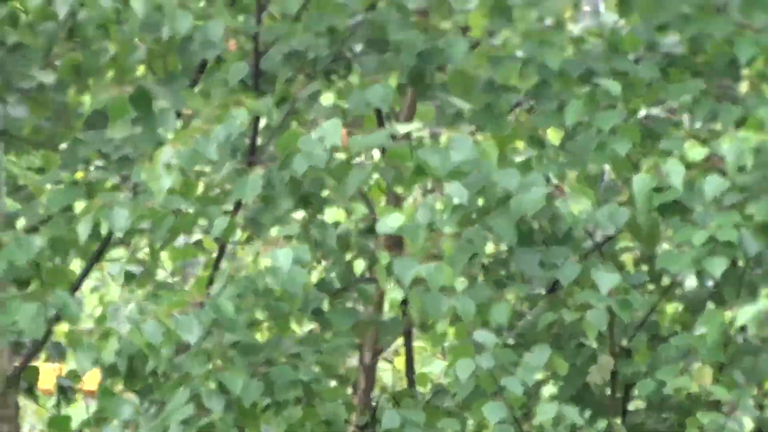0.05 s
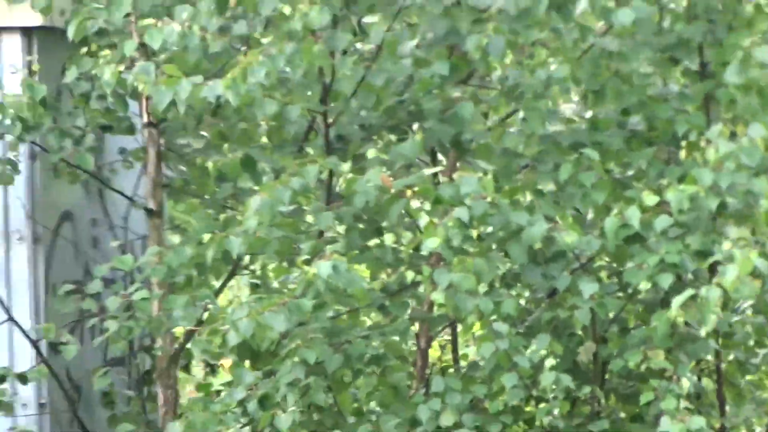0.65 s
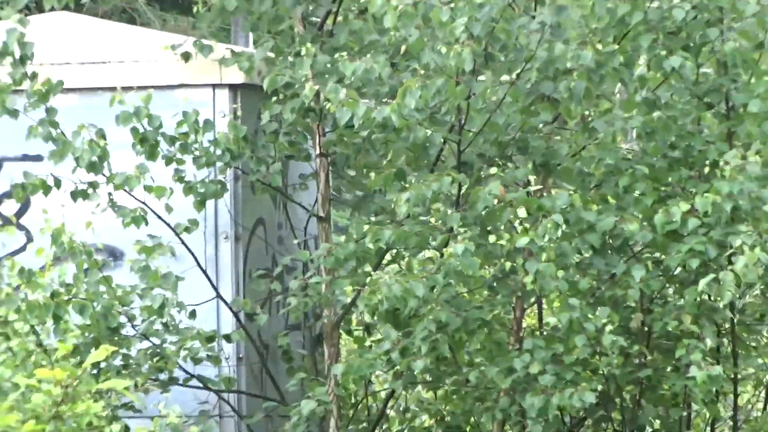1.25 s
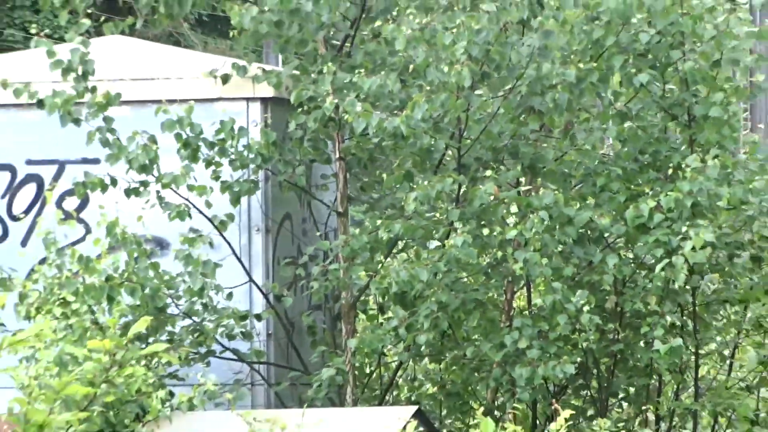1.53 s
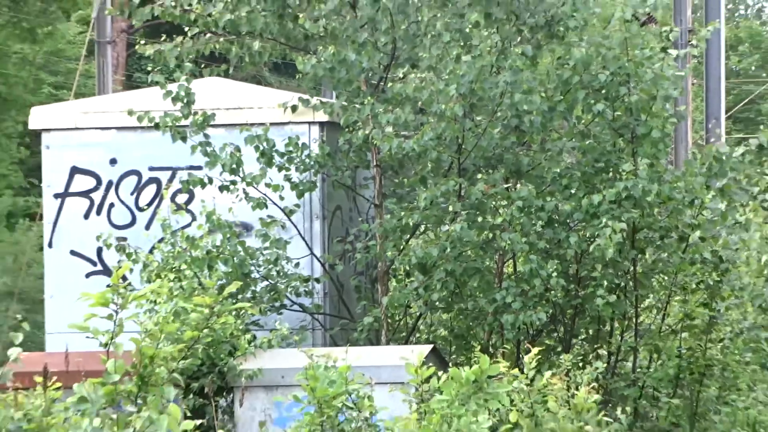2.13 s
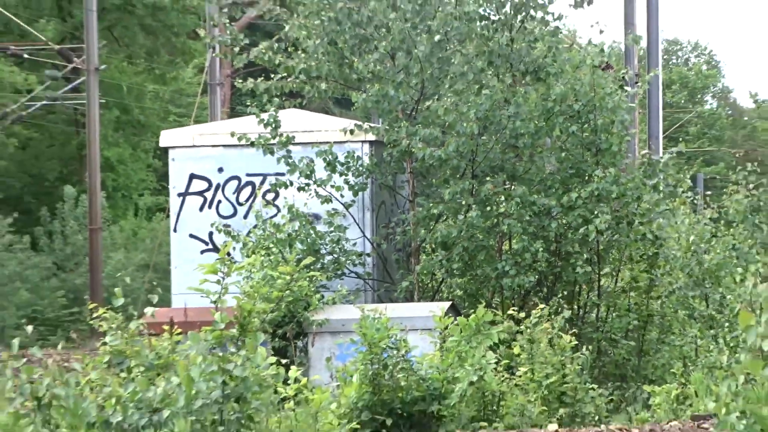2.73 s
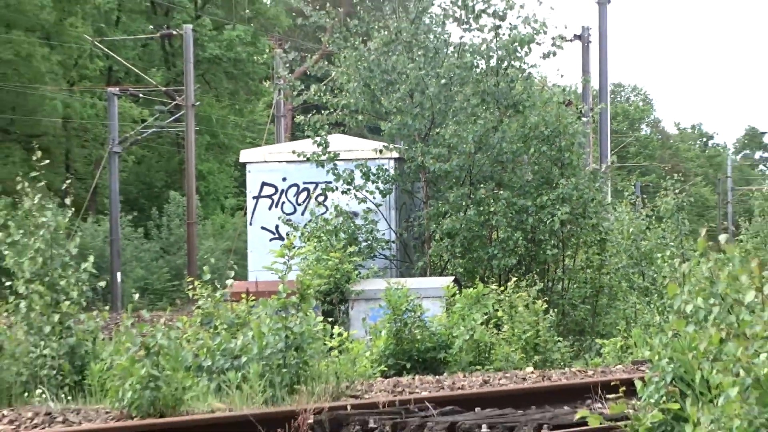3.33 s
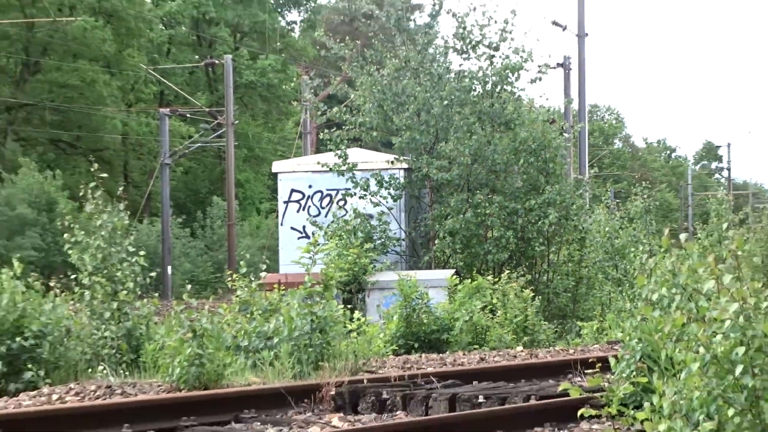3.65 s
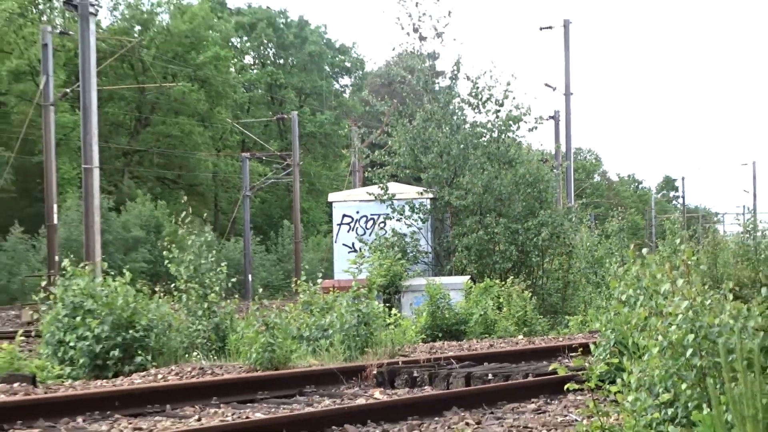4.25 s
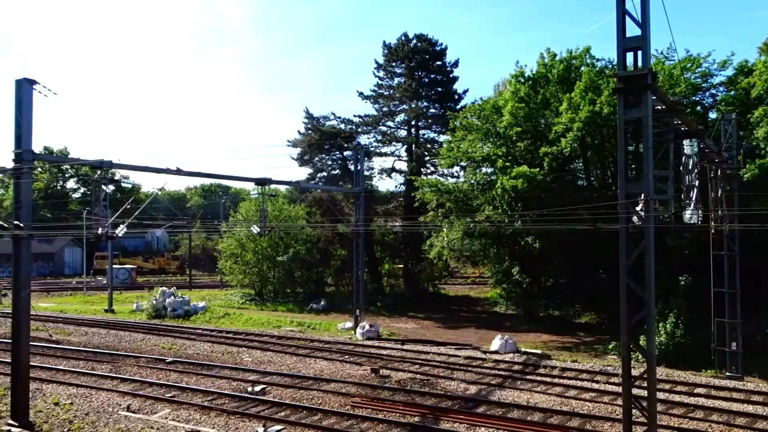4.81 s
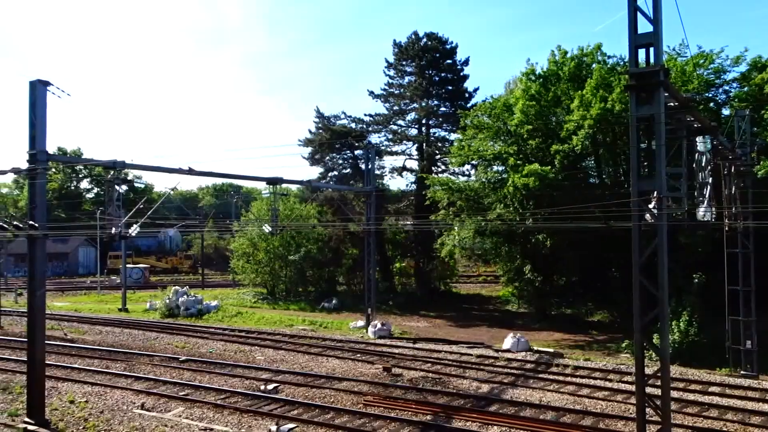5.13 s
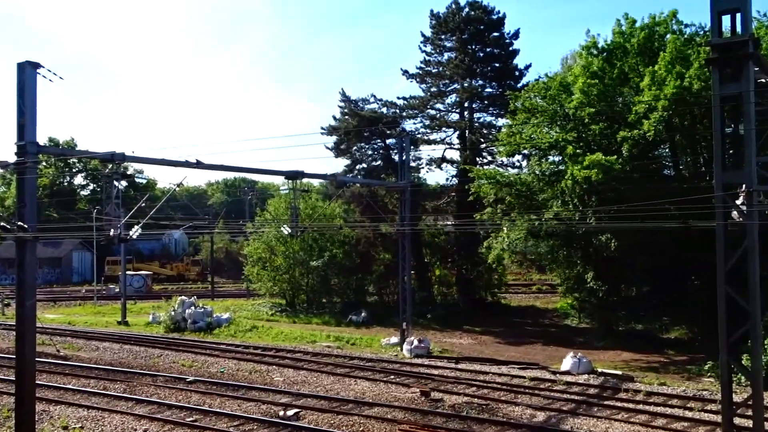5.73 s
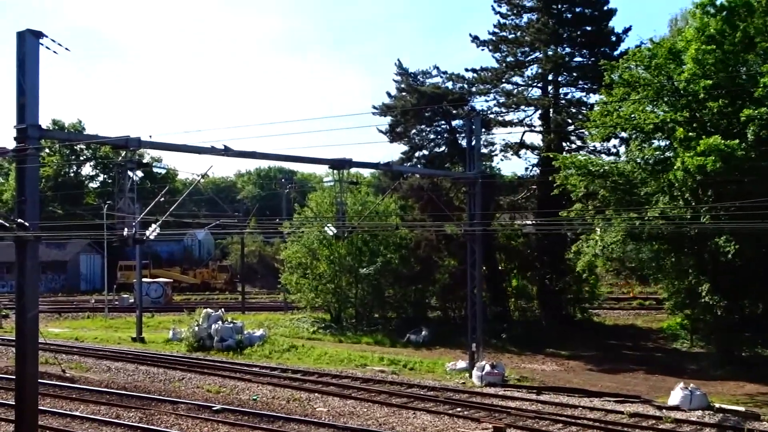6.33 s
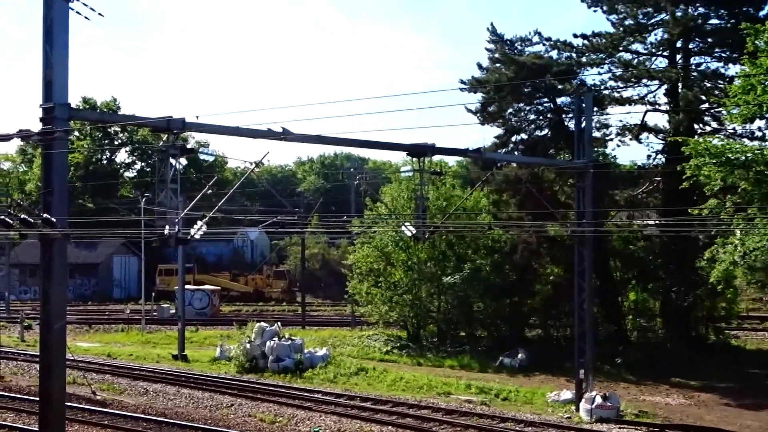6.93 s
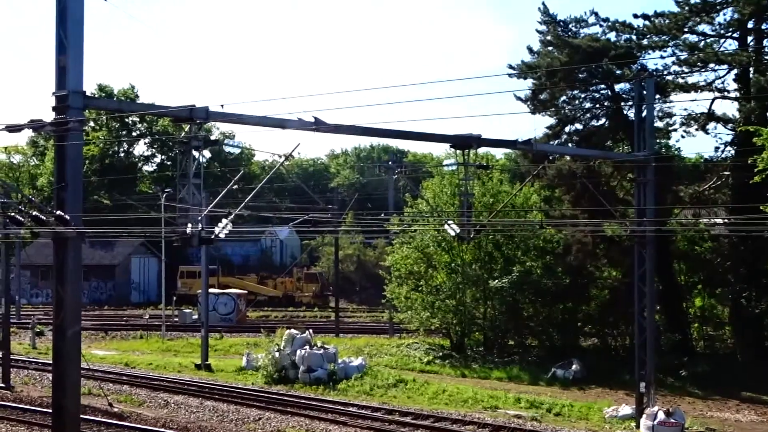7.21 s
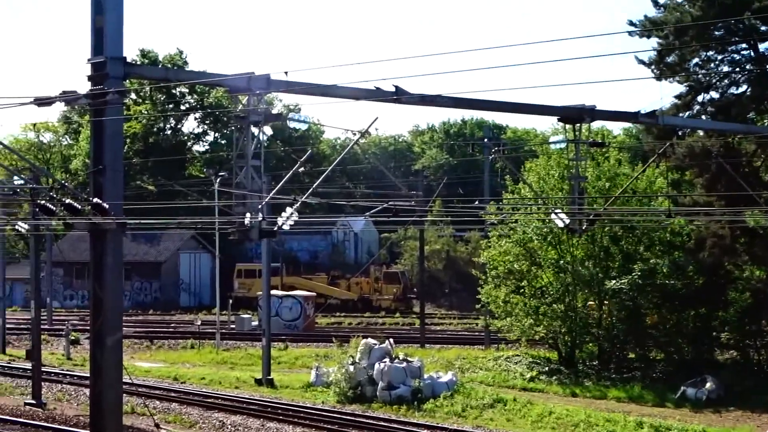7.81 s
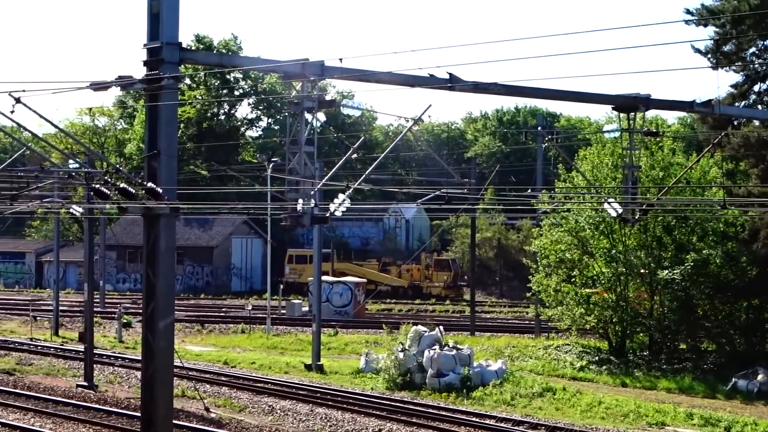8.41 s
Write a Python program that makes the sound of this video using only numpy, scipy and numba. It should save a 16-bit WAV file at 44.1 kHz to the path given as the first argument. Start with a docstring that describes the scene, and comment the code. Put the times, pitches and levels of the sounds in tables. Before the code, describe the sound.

A distant diesel fades behind hushed woods, then a rail vehicle rolls along and sounds two short echoing horn blasts, high then low.

```python
"""An air horn on a diesel track vehicle sounds a high blast, then a low one: compressed air drives
a diaphragm, and a bell shapes its harmonics. Tree lines and sheds reflect the blasts, and gain control
ducks under them. Two scenes play in turn. First, beside a railway, a diesel behind trees runs down to
idle, birds chirp, leaves tick and a hand knocks and swings a camera. Then, in a yard, the vehicle runs
with its wagons, sounds the horn and coasts. Light wind rumbles on the microphone throughout."""
import sys
import numpy as np
from scipy import signal
from scipy.io import wavfile
from scipy.ndimage import uniform_filter1d, map_coordinates
from numba import njit

SR = 44100
rng = np.random.default_rng(int(sys.argv[2]) if len(sys.argv) > 2 else 0)


def master_out(mix):
    """Clip the mix to full scale and print it as 16-bit PCM to the path in sys.argv[1]."""
    frames = np.transpose(np.atleast_2d(mix))
    ceiling = np.clip(frames, -1, 1)
    pcm = np.round(ceiling * 32767).astype(np.int16)
    wavfile.write(sys.argv[1], SR, pcm)


N = 373527
T = np.arange(N) / SR
YARD_START_S, TOP_HZ = 4.823, 11020

# Noise spectra of the sources. Each row: frequency in Hz, relative spectral density in dB.
LOW_RUMBLE_SPECTRUM = [(15, -11), (35, -4.5), (65, 0), (110, -15), (250, -30), (600, -63)]
TWITTER_SPECTRUM = [(2400, -43), (3100, -6), (3500, 3), (3850, -10), (4200, -1.5), (4900, -17),
                    (6400, -10), (8000, -37)]
DRONE_SPECTRUM = [(120, -42), (175, 2), (205, 43), (250, -16), (400, -51.5)]
WOODS_SPECTRUM = [(20, -24), (35, -12), (60, -4), (105, -7), (150, -4.5), (200, 3), (290, -1), (380, -3),
                  (550, -1.5), (700, -1), (1270, -1), (1550, -6), (2100, -7.5), (2900, -14), (4100, -14.5),
                  (5000, -20), (6300, -16), (11000, -27.5)]
FAR_ROAR_SPECTRUM = [(60, -35), (300, -11), (500, -10), (620, -3.5), (870, 0), (1100, -1), (1620, 1),
                     (2260, -5.5), (2900, -17), (3800, -17.5), (4700, -24), (6600, -24), (11000, -45)]
RUSTLE_SPECTRUM = [(300, 7), (1500, -2), (2400, 6), (3500, 3), (5000, 0), (8000, 6), (11000, 0.5)]
ENGINE_SPECTRUM = [(25, -53), (55, -33.5), (85, -45), (130, -8.5), (190, 2), (260, 7), (330, 0.5),
                   (480, -4), (800, -40.5)]
WHEEL_SPECTRUM = [(350, -21), (520, -10.5), (610, -2.5), (900, 1), (1230, -12), (1450, -5.5), (1680, -6),
                  (2000, -14.5), (2500, -16), (3100, -25.5), (4500, -44), (10000, -61.5)]
HISS_SPECTRUM = [(2500, -17), (3700, 4.5), (4300, 6.5), (6800, 4), (7700, -3.5), (8300, -2), (9000, -8.5),
                 (11000, -11)]
FAN_SPECTRUM = [(1500, -29), (2600, 8.5), (3800, 10), (4400, 3), (5200, -42), (9000, -16)]
# Stereo width of the noises. Each row: frequency in Hz, side level relative to mid in dB.
STEREO_WIDTH = [(60, -12.5), (150, -40), (500, -14.5), (1000, -15), (3000, -11.5), (8000, -9.5)]
# Swells of four noises. Each row: centre in seconds, half length in seconds, peak gain in dB.
# The low swell at 7.09 seconds is a short thump as the low horn blast starts.
LOW_SWELLS = [(.5, 0.22, -60), (1.35, .15, -68), (6.1, 0.46, -56.5), (7.09, .05, -51), (8.4, 0.45, -59)]
TWITTER_SWELLS = [(1.6, 0.38, -50.5)]
RUSTLE_SWELLS = [(0, 0.15, -46.5), (4.2, 0.17, -51), (4.78, 0.19, -42)]
HISS_SWELLS = [(5.3, 0.25, -52.5)]
# Bird chirps. Each row: centre in seconds, pitch in Hz, length in seconds, level in dB.
BIRD_CHIRPS = [(.14, 3940, .08, -44.5), (1.65, 6430, .07, -51)]
# Dry ticks. Each row: start in seconds, level in dB.
DRY_TICKS = [(.09, -31), (0.352, -31), (3.817, -32), (4.125, -33), (7.3982, -12.5), (7.633, -28.5)]
# Knocks on the camera. Each row: start in seconds, level in dB, ring in Hz, relative snap level in dB.
CAMERA_KNOCKS = [(4.312, -21.5, 1330, -14), (4.355, -21, 2200, 7.5), (4.36, -13, 3020, -7),
                 (4.3703, -35.5, 6100, 17), (4.5786, -10.5, 3000, -16), (4.5827, -30, 1000, -14),
                 (4.59, -27, 1490, -3), (4.5946, -12.5, 2920, -15), (4.806, -14.5, 1580, -14)]
# Echoes from trees and sheds. Each row: delay in seconds, smear in seconds, relative energy in dB.
YARD_ECHOES = [(0.042, 0.041, -9), (0.167, 0.021, -7), (.338, .035, -18), (1.142, 0.023, -29)]
# Spectral envelopes of the horn bells. Each row: frequency in Hz, relative harmonic level in dB.
HIGH_BELL_SPECTRUM = [(675, 0), (1350, -5.5), (2025, -12), (2700, -18), (4050, -21), (4720, -27),
                      (5400, -27.5), (6750, -29.5), (8100, -31.5), (9400, -44), (11000, -60)]
LOW_BELL_SPECTRUM = [(366, -4), (732, 0.5), (1100, -5.5), (1470, -9), (1830, -14), (2200, -19.5),
                     (2560, -20.5), (2930, -19.5), (4000, -30), (6600, -33.5), (11000, -53.5)]
# Air supply at the horn valve. Each row: time in seconds, pressure as a fraction of full.
VALVE_PRESSURE = [(6.15, 0.44), (6.27, 0.42), (6.36, 0.83), (6.47, .85), (7.06, 0.97), (7.14, 0.79),
                  (7.16, 0.92), (7.195, 0.91), (7.215, .64)]
# Horn blasts. Each row: start and stop in seconds, nominal pitch in Hz, gain in dB, share of the air,
# initial sharpness and jitter as fractions of the pitch, relative air noise in dB.
HORN_BLASTS = [(6.147, 6.478, 677.5, -0.5, 0.98, 0.0226, 0.0039, -33),
               (6.466, 6.638, 373, -16.5, 0.2, .002, 0.024, -3),
               (7.059, 7.261, 368.2, -7, 0.98, 0.0058, 0.0062, -14.5)]


def undb(db):
    """Amplitude grows tenfold for every 20 dB."""
    return 10 ** (np.asarray(db) / 20)


def level_at(spectrum, hz):
    """Interpolation in log frequency gives a spectrum's level in dB."""
    points_hz, db = np.transpose(spectrum)
    return np.interp(np.log(np.maximum(hz, 1)), np.log(points_hz), db)


def band(x, lo_hz, hi_hz):
    """A band-pass filter attenuates gently beyond its two edges."""
    return signal.sosfilt(signal.butter(2, [lo_hz, hi_hz], "band", fs=SR, output="sos"), x)


def wander(rate_hz):
    """Smoothing random steps gives a drift of unit deviation."""
    hold = int(SR / rate_hz)
    steps = np.repeat(rng.standard_normal(N // hold + 1), hold)
    drift = uniform_filter1d(uniform_filter1d(steps, hold), hold)[:N]
    return drift / drift.std()


def ramp(start_s, length_s):
    """A linear transition runs from 0 to 1."""
    return np.clip((T - start_s) / length_s, 0, 1)


def swells(rows):
    """Gaussian swells add up to one gain curve."""
    return sum(undb(db) * np.exp(-((T - s) / half_s) ** 2) for s, half_s, db in rows)


def stereo(mid, side):
    """Left and right are the sum and difference of mid and side."""
    return np.array([mid + side, mid - side])


def noise(spectrum, flicker_db, rate_hz):
    """Random modulation makes each half octave of a stereo noise flicker; the mid has unit rms."""
    hz, times, bins = signal.stft(rng.standard_normal((2, N)), SR, nperseg=2048)
    grid = np.meshgrid(2 * np.log2(1 + hz / 20), times * rate_hz, indexing="ij")
    flicker = map_coordinates(rng.standard_normal((24, 512)), grid, order=1, mode="mirror")
    bins = bins * undb(level_at(spectrum, hz)[:, None] + flicker_db * flicker)
    bins[1] *= undb(level_at(STEREO_WIDTH, hz))[:, None]
    mid, side = signal.istft(bins, SR, nperseg=2048)[1][:, :N]
    return stereo(mid, side) / mid.std()


def place(out, start_s, sound, side):
    """A level difference between the channels sets a short sound off centre."""
    i = int(start_s * SR)
    out[:, i:i + len(sound)] += stereo(sound, side * sound)[:, :N - i]


def burst(t, lo_hz, hi_hz, decay_s):
    """Exponential damping turns a band of noise into a puff of peak 1."""
    puff = band(rng.standard_normal(len(t)), lo_hz, hi_hz) * np.exp(-t / decay_s)
    return puff / np.abs(puff).max()


def low_rumble():
    """Wind turbulence rumbles at the microphone; a short low thump comes as the low horn blast starts."""
    return noise(LOW_RUMBLE_SPECTRUM, flicker_db=3.5, rate_hz=4.7) * (undb(-68.5) + swells(LOW_SWELLS))


def woods():
    """Broadband noise is heard as the hush of the woods, narrowband noise as a low drone."""
    hush = noise(WOODS_SPECTRUM, flicker_db=2.2, rate_hz=14) * undb(-45)
    drone = noise(DRONE_SPECTRUM, flicker_db=1, rate_hz=7.7) * undb(-59)
    return hush + drone


def leaves(count=50):
    """Light impacts make brief, high ticks as leaves tap each other in the breeze."""
    out, t = np.zeros((2, N)), np.arange(SR // 100) / SR
    for when, size, position in rng.random((count, 3)):
        tap = undb(-47.5 + 14.4 * size) * burst(t, 4700, 10200, decay_s=0.00059)
        place(out, when * YARD_START_S, tap, side=position - 0.5)
    return out


def birds():
    """Frequency modulation makes thin whistles waver; far twittering blurs into noise."""
    hz, envelope = np.zeros(N), np.zeros(N)
    for centre_s, pitch_hz, length_s, db in BIRD_CHIRPS:
        live = np.abs(T - centre_s) < length_s / 2
        hz[live] = pitch_hz
        envelope[live] = undb(db) * np.cos(np.pi * (T[live] - centre_s) / length_s)
    phase = 2 * np.pi * np.cumsum(hz * (1 + 0.0134 * wander(250))) / SR
    twitter = noise(TWITTER_SPECTRUM, flicker_db=3.5, rate_hz=30) * swells(TWITTER_SWELLS)
    return envelope * np.sin(phase) + twitter


def ticks():
    """Rapid decay makes bursts of treble sound as dry ticks."""
    out, t = np.zeros((2, N)), np.arange(SR // 20) / SR
    for start_s, db in DRY_TICKS:
        place(out, start_s, undb(db) * burst(t, 3600, 9100, decay_s=0.00086), side=0.15)
    return out


def camera_rustle():
    """Friction of the hand rustles as the camera swings."""
    return noise(RUSTLE_SPECTRUM, flicker_db=3, rate_hz=30) * swells(RUSTLE_SWELLS)


def camera_knocks():
    """Each impact excites a damped resonance of the plastic shell, with a thud and a snap."""
    out, t = np.zeros((2, N)), np.arange(SR // 20) / SR
    for start_s, db, ring_hz, snap_db in CAMERA_KNOCKS:
        ring = 0.94 * np.sin(2 * np.pi * ring_hz * t) * np.exp(-t / 0.00069)
        thud = 0.43 * burst(t, 300, 2900, decay_s=0.0061)
        snap = undb(snap_db) * burst(t, 3700, 11700, decay_s=0.0012)
        place(out, start_s, undb(db) * (ring + thud + snap), side=-0.29)
    return out


def by_load(idling, load_db, idle_db):
    """Gain follows the load, moving linearly in decibels towards idle."""
    return undb(load_db + (idle_db - load_db) * idling)


def firing_phase(idling, load_hz, idle_hz):
    """Phase is the integral of a diesel's slightly unsteady firing rate."""
    hz = load_hz + (idle_hz - load_hz) * idling
    return 2 * np.pi * np.cumsum(hz * (1 + 0.01 * wander(8.9))) / SR


def far_diesel(throttle_shut_s=0.93, loudest_s=0.58, fade_s=1.167):
    """The firing tone drops as the engine runs down to idle, and its roar dies away with it."""
    idling = ramp(throttle_shut_s, 0.94)
    tone = np.sqrt(2) * np.sin(firing_phase(idling, load_hz=105, idle_hz=51.6))
    tone *= by_load(idling, -69, -64.5) * undb(2.9 * wander(7.9))
    roar_db = -32.5 - 33.5 * np.log10(1 + ((T - loudest_s) / fade_s) ** 2)
    return tone + noise(FAR_ROAR_SPECTRUM, flicker_db=-1, rate_hz=6.54) * undb(roar_db)


def track_vehicle(throttle_shut_s=7.02):
    """Firing modulates the rumble and rolling contact roars; at idle all but the fan grow quieter."""
    idling, coasting = ramp(throttle_shut_s, 0.94), ramp(throttle_shut_s, 0.74)
    firing = firing_phase(idling, load_hz=107, idle_hz=55.2)
    tone = np.sin(firing) * by_load(idling, -52.5, -60.5)
    rumble = noise(ENGINE_SPECTRUM, flicker_db=2, rate_hz=14) * by_load(coasting, -33.5, -37)
    rumble *= 1 + 0.18 * np.cos(firing)
    wheels = noise(WHEEL_SPECTRUM, flicker_db=0, rate_hz=9.6) * by_load(coasting, -30, -39.5)
    hiss = noise(HISS_SPECTRUM, flicker_db=1.3, rate_hz=16)
    hiss *= by_load(coasting, -48, -58.5) + swells(HISS_SWELLS)
    fan = noise(FAN_SPECTRUM, flicker_db=1.2, rate_hz=12) * by_load(coasting, -58.5, -51)
    nearing = undb(3 * (ramp(YARD_START_S, 0.81) - 1))
    return tone + rumble + (wheels + hiss) * nearing + fan


def yard_echoes(x, t60_s=2.37, treble_t60_s=4.1, tail_db=-9.5):
    """Reflection gives smeared echoes; scattering gives a slow tail that loses its treble first."""
    t = np.arange(2 * SR) / SR
    build_up = np.minimum(t / 0.2, 1) ** 2
    power = undb(tail_db) ** 2 * undb(-120 * t / t60_s) * np.log(1e6) / t60_s * build_up
    for delay_s, smear_s, db in YARD_ECHOES:
        power += undb(db) ** 2 * (t > delay_s) * np.exp(-np.abs(t - delay_s) / smear_s) / smear_s
    scatter = rng.standard_normal((3, len(t))) * np.sqrt(power / SR)
    # Long waves pass through the trees instead of returning.
    scatter = signal.sosfilt(signal.butter(2, 540, "high", fs=SR, output="sos"), scatter)
    low = signal.sosfiltfilt(signal.butter(2, 2800, fs=SR, output="sos"), scatter)
    response = low + (scatter - low) * undb(-60 * t / treble_t60_s)
    one, other, wide = signal.fftconvolve(x[None], response, axes=1)[:, :N]
    sway_rad = 1.4 * wander(12)  # stirring air and branches shift the echoes
    mid = one * np.cos(sway_rad) + other * np.sin(sway_rad)
    # Only short waves differ between two closely spaced microphones.
    return stereo(mid, 0.38 * band(wide, 940, 15000))


def horn_blast(start_s, stop_s, hz, db, air_share, sharpness, jitter, air_db):
    """An air-driven diaphragm oscillates; more pressure lifts the pitch and makes the bell brassier."""
    brass_db, overblow_pressure, treble_lag_s = 30, 0.777, 0.015
    bell = HIGH_BELL_SPECTRUM if hz > 500 else LOW_BELL_SPECTRUM
    live = (T > start_s) & (T < stop_s + 0.1)
    t = T[live] - start_s
    pressure = air_share * np.interp(T[live], *np.transpose(VALVE_PRESSURE))
    # Overblowing weakens the lowest partials.
    thinning_db = 12 * np.maximum(pressure - overblow_pressure, 0) / (1 - overblow_pressure)
    sharp_start = sharpness * np.exp(-(t / 0.0382) ** 2)
    pitch_hz = hz * (1 - 0.02644 * (1 - pressure) + sharp_start + jitter * wander(170)[live])
    phase = 2 * np.pi * np.cumsum(pitch_hz) / SR
    tone = 0
    for k in range(1, int(TOP_HZ / hz) + 1):
        height = min(np.log(k) / np.log(6), 1)
        onset = np.clip((t - treble_lag_s * height) / 0.0047, 0, 1)  # low harmonics speak first
        # Turbulent air along the path makes short waves flutter most.
        flutter = np.interp(t * 70, np.arange(64), rng.standard_normal(64))
        gain_db = level_at(bell, k * hz) + min(1.2 * k - 0.7, 3.6) * flutter
        gain_db -= height * brass_db * (1 - pressure) + thinning_db * (k * hz < 900)
        tone += undb(gain_db) * onset * np.cos(k * phase + k ** 2)
    puff = undb(air_db + 12.5 * np.exp(-t / 0.016))  # settles to a steady rush
    valve_rush = undb(-37.5) * np.abs(np.gradient(pressure, t))
    air = band(rng.standard_normal(len(t)) * (1 + np.cos(phase)), 370, 1400) * (puff + valve_rush)
    closing = np.maximum(T[live] - stop_s, 0) / 0.0071
    out = np.zeros(N)
    out[live] = (tone + air) * np.exp(-closing ** 2) * undb(db)
    return out


def air_horns(spill_db=3.5):
    """Direct and reflected sound superpose: a high blast, a leak into the low horn, a low blast."""
    direct = sum(horn_blast(*blast) for blast in HORN_BLASTS)
    return stereo(direct, 0.053 * direct) + yard_echoes(undb(spill_db) * direct)


def scene():
    """The sources superpose; the lineside stops abruptly and the yard fades in."""
    lineside = (woods() + leaves() + camera_rustle() + far_diesel()) * (T < YARD_START_S)
    fade_in = 1 - np.exp(-np.maximum(T - YARD_START_S - 0.012, 0) / 0.081)
    background = low_rumble() + birds() + ticks() + camera_knocks()
    return background + lineside + track_vehicle() * fade_in + air_horns()


@njit
def follow(x, attack, release):
    """An envelope follower rises quickly and falls slowly."""
    out, level = np.empty(len(x)), 0.
    for i in range(len(x)):
        level += (x[i] - level) * (attack if x[i] > level else release)
        out[i] = level
    return out


def record(dry, limit_db=-6.5, attack_s=0.0001, release_s=0.55):
    """Automatic gain control holds down peaks and recovers slowly; a low-pass cuts the top."""
    envelope = follow(np.abs(dry).max(axis=0), 1 / (attack_s * SR), 1 / (release_s * SR))
    held = dry / np.maximum(envelope / undb(limit_db), 1)
    return signal.sosfilt(signal.ellip(10, 0.2, 70, TOP_HZ, fs=SR, output="sos"), held)


dry = scene()
out = record(dry)
master_out(out)
```